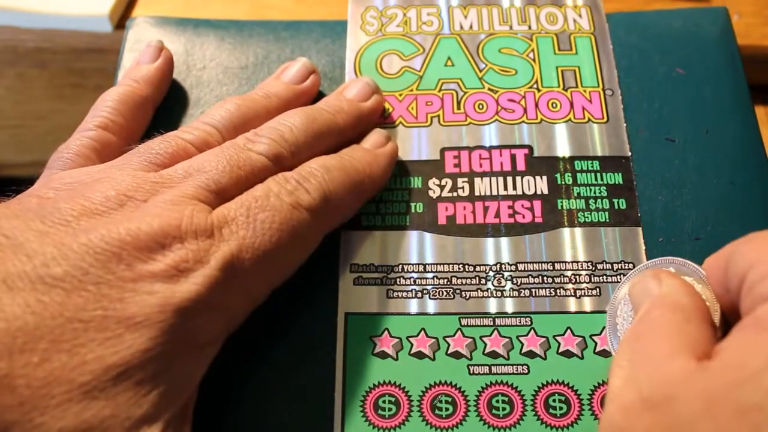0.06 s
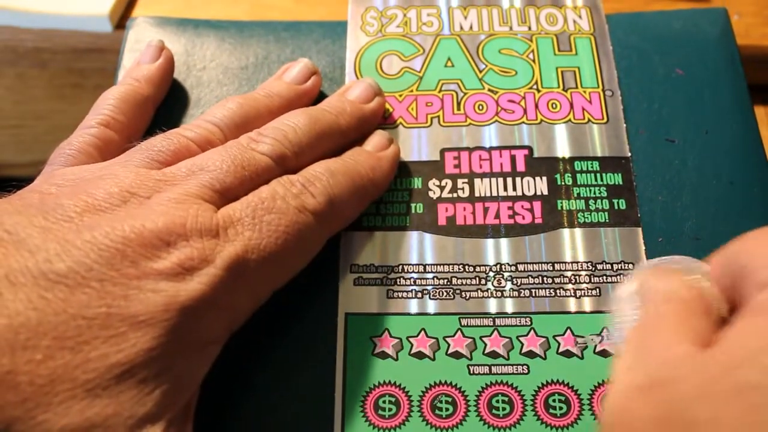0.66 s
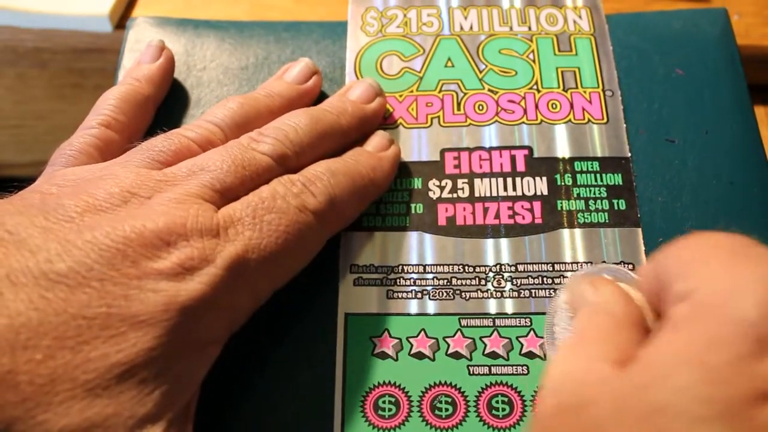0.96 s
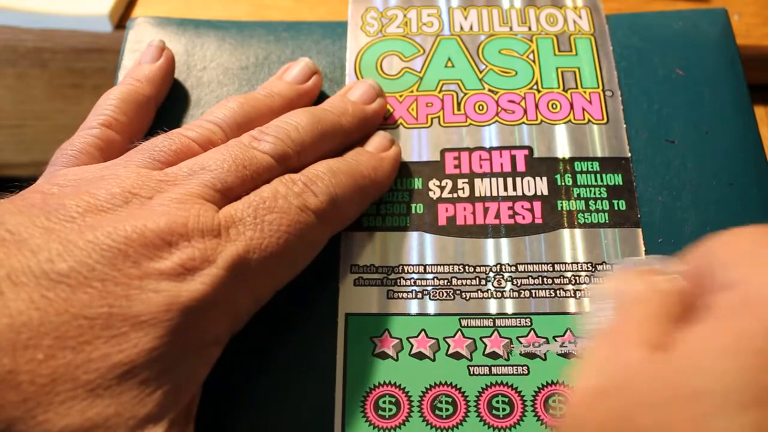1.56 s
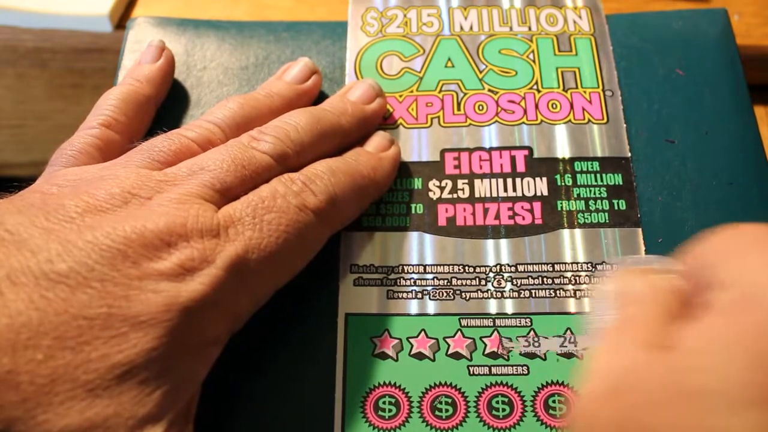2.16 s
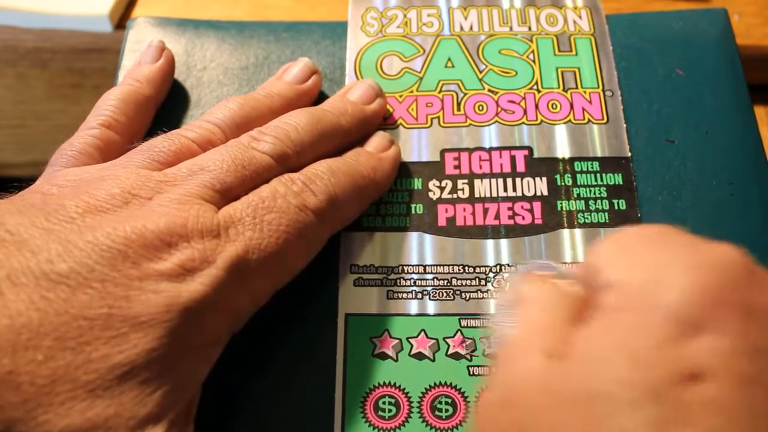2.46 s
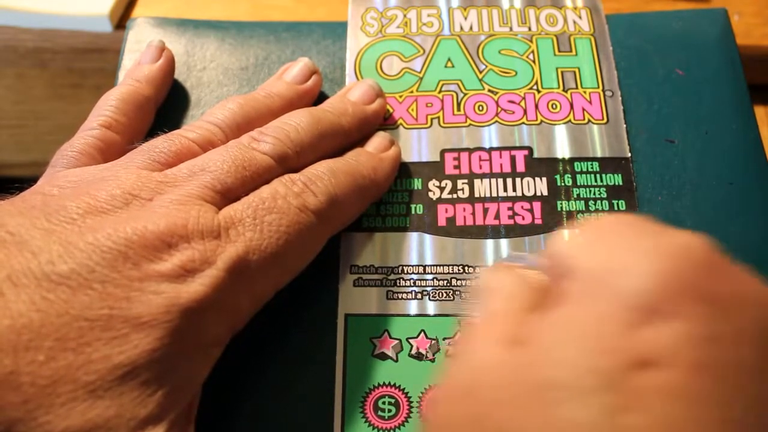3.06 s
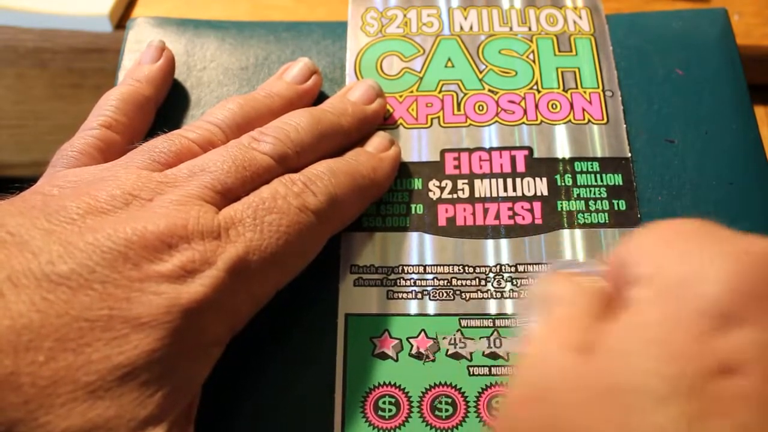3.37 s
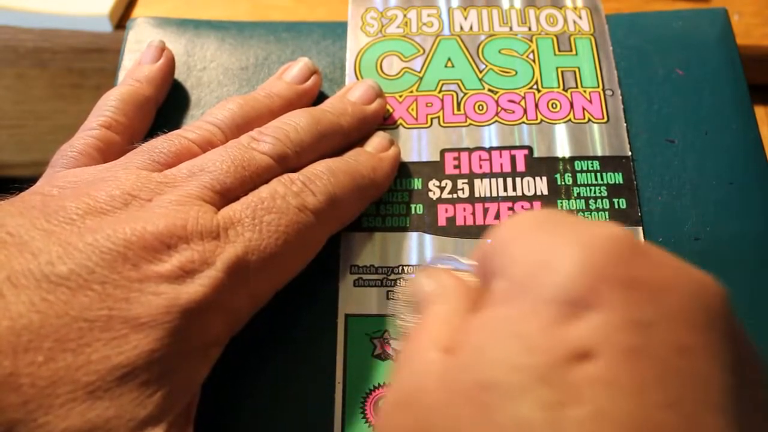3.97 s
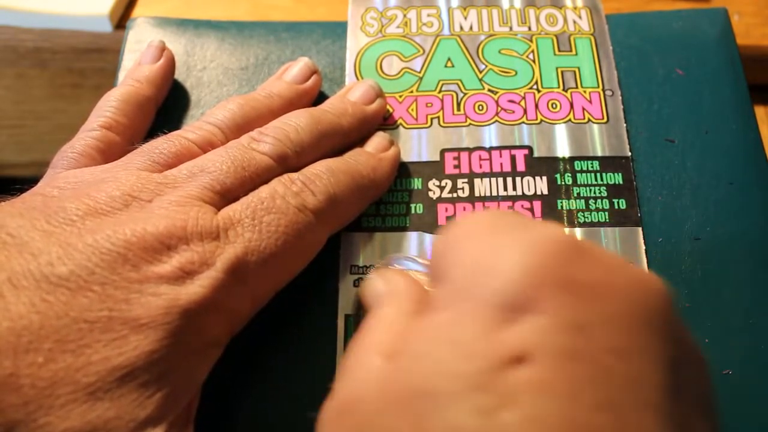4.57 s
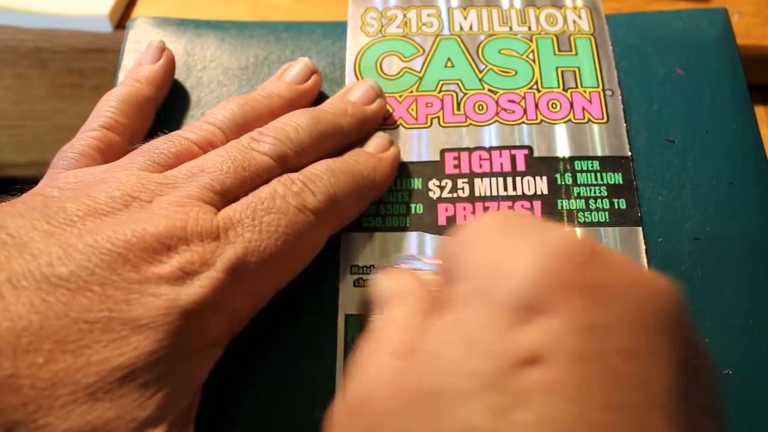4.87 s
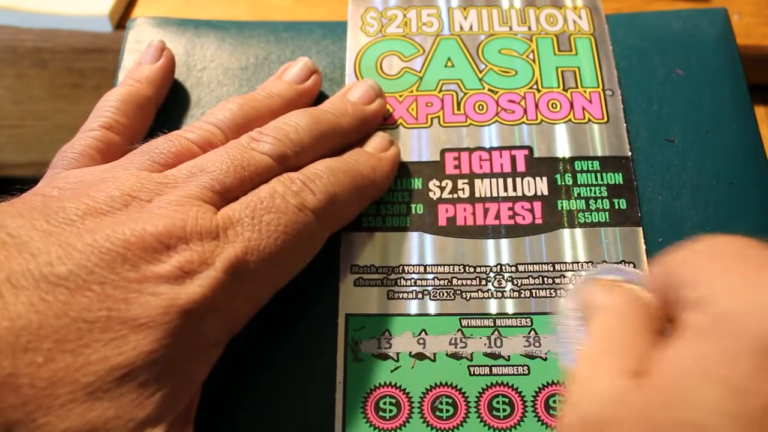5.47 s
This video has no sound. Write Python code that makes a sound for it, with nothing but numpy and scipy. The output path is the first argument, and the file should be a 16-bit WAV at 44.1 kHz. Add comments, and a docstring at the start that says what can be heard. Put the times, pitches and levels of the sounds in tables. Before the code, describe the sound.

A coin scratches a paper ticket in quick, raspy back-and-forth strokes, with soft table thumps, in a quiet room.

```python
"""A small, quiet room, the microphone close to a paper ticket on a padded folder on a wooden table.
A faint clockwork ticks throughout. A coin lands with a few thumps, then scratches at the ticket, hard
forward strokes alternating with lighter returns: the coating crumbles in fine grains, the card rubs,
the table drums. Flakes snap off, the card clacks, the rim ticks; later come brief swishes and thin
whistles. At the end the hand slides away over the glossy card."""
import sys
import numpy as np
from scipy import signal
from scipy.fft import rfft, irfft
from scipy.io import wavfile

SR = 44100
rng = np.random.default_rng(int(sys.argv[2]) if len(sys.argv) > 2 else 0)


def master_out(mix):
    """Clip the mix to full scale and print it as 16-bit PCM to the path in sys.argv[1]."""
    frames = np.transpose(np.atleast_2d(mix))
    ceiling = np.clip(frames, -1, 1)
    pcm = np.round(ceiling * 32767).astype(np.int16)
    wavfile.write(sys.argv[1], SR, pcm)


N = 251590
TIME = np.arange(N) / SR
FFT_SIZE = 8192
FREQS = np.maximum(np.arange(FFT_SIZE // 2 + 1) * SR / FFT_SIZE, 1)

# the quiet room at the microphone: (frequency [Hz], relative level [dB])
ROOM_SPECTRUM = [(15, -28), (25, -3.5), (44, -1), (264, -4), (588, -11), (691, -8), (978, -12), (4380, -17),
                 (5570, -18.5), (6200, -16.5), (15000, -37.5)]
# resonances of the clockwork: (frequency [Hz], width [Hz], height [dB])
CLOCK_MODES = [(5400, 500, 17), (7540, 280, 14), (8250, 1200, 14), (9500, 930, 4)]
# overall slope of coin, card and table together: (frequency [Hz], relative level [dB])
BODY_SLOPE = [(50, -21.5), (130, -24), (230, -10.5), (400, -1), (560, -14), (700, -22.5), (1150, -17.5),
              (1650, -30.5), (3200, -24.5), (4500, -15), (7500, -27), (9300, -34.5), (11500, -48.5),
              (15000, -61)]
# their resonances, table below 600 Hz, card and coin above: (frequency [Hz], width [Hz], height [dB])
BODY_MODES = [(112.3, 8.4, 11.5), (151, 7.3, 12.5), (205, 14.4, 6), (261.7, 19.4, 7.5), (305.2, 25, 5.5),
              (422, 100, 3), (503, 41, 7), (584.7, 39.5, 10), (868, 123, 8), (1077, 19, 3), (1250, 124, 5),
              (2034, 326, 16), (2550, 350, 6), (2948, 63, 6), (4010, 75, 3.5), (4563, 420, -13),
              (5100, 98, 2), (6690, 53, 7), (6920, 43, -16), (7240, 450, 5.5), (9990, 280, 12)]
# the coin lands or catches and thumps the table: (time [s], level [dB])
TABLE_KNOCKS = [(0.375, -35), (0.429, -34), (0.444, -34), (0.461, -31), (0.487, -15.5), (0.497, -11.5),
                (0.645, -27.5), (0.895, -18), (1.252, -14), (1.443, -16.5), (1.464, -13), (2.002, -11.5),
                (2.138, -18.5), (2.319, -14), (2.397, -16.5), (2.515, -22), (2.563, -25), (3.113, -15),
                (3.387, -19), (3.871, -12.5), (4.415, -13.5), (4.857, -15), (5.124, -38), (5.428, -13)]
# strokes, forward and back in turn: (time [s], length [s], coating rasp [dB], card rub [dB],
# table drumming [dB], swell from start to end [dB], upper over lower rasp [dB],
# singing edge over rasp [dB], top treble over rasp [dB], deep boom over drumming [dB])
COIN_STROKES = [(0.494, 0.063, -39, -44.5, -34, -1.5, -5.5, -3, -14, -9.5),
                (0.66, 0.043, -49, -44, -38, 1, -2, -6, -5, -14),
                (0.843, 0.078, -34, -42, -31.5, 2.5, -0.5, -4, -11, -8.5),
                (1.038, 0.073, -38, -45, -36.5, -3, -2.5, -12, -10.5, -17.5),
                (1.193, 0.092, -36.5, -44, -32, 7.0, -0.5, -0.5, -7, -10),
                (1.381, 0.11, -40.5, -43, -37, -4.5, 3, -26, -8, -15),
                (1.553, 0.12, -38, -43, -32.5, 7.5, -1, -2, -10, -12.5),
                (1.752, 0.076, -37, -43.0, -35.0, -2, -0.5, -27, -8, -12.5),
                (1.92, 0.093, -36, -41.5, -32.5, 4, 1.5, -2.5, -7.5, -10.5),
                (2.124, 0.096, -45, -46, -37.5, -10, -1, -20, -9.5, -17),
                (2.282, 0.096, -37, -42.5, -33, 13, 0.5, -2, -7, -11.5),
                (2.499, 0.098, -44.5, -49, -37.5, -4.5, 1, -17.0, -8, -18),
                (2.665, 0.11, -36, -43, -31.5, 2.5, 2.0, -5.5, -8.0, -11.5),
                (2.858, 0.077, -39.5, -48, -34.5, -8, -1.5, -8, -8.5, -15),
                (3.039, 0.104, -38.5, -46.5, -33.0, -7, 0.5, -13.5, -10.5, -12),
                (3.241, 0.084, -46, -51, -35.5, -4.5, 0, -10.5, -8.5, -16.5),
                (3.402, 0.12, -36, -43.0, -30, 7.5, -0.5, -8, -8, -14.5),
                (3.621, 0.082, -40, -46.0, -36, -4.0, 2.5, -14, -8.5, -17.0),
                (3.78, 0.12, -39.0, -46.5, -30.0, 5.5, 1, -8, -7.5, -17.5),
                (3.992, 0.097, -42.5, -50.5, -36.5, -4, 1, -16, -7.5, -19),
                (4.151, 0.11, -39, -46, -30.5, -0.5, 2, -13, -6, -22.5),
                (4.339, 0.11, -40.5, -45, -35.0, -2.5, 1, -10, -6.5, -20),
                (4.503, 0.093, -40.5, -46.5, -31.0, 3.5, 2, -17.0, -6.5, -21),
                (4.661, 0.11, -45.5, -50, -37.5, 6.5, 1, -13, -6, -23),
                (4.831, 0.085, -41.5, -45.5, -31, 1.5, 0, -9, -7, -18),
                (4.989, 0.077, -43.5, -46.5, -36.5, 4.5, 1, -15, -6.5, -20.5),
                (5.149, 0.062, -39.5, -45, -32.5, -5, 1, -14, -8, -12.5),
                (5.324, 0.2, -39.0, -43.5, -34, 1.5, 4.5, -22, -6.5, -20),
                (5.579, 0.11, -39.5, -47, -36, 6, -3.5, -14.5, -10.5, -14.5)]
# the coin digs in for a moment within a stroke: (time [s], lift [dB])
COIN_BITES = [(0.515, 1), (1.25, -0.5), (1.405, 4.5), (2.005, 4), (2.37, 1.5), (2.519, 8.5), (3.04, 2.5),
              (3.132, 9.5), (3.262, 11.5), (3.475, 2), (3.87, 2.5), (4.236, 5.5), (4.59, 4), (4.721, 2.5),
              (5.448, 5)]
# crisp snaps of flaking coating: (time [s], level [dB])
FLAKE_SNAPS = [(0.699, -29.5), (1.49, -25.5), (1.91, -42), (2.004, -20.5), (2.2057, -24), (2.271, -31),
               (2.508, -26), (2.565, -28), (2.6605, -24), (2.7284, -16), (3.027, -42), (3.6188, -26),
               (4.7128, -21.5), (5.146, -26)]
# the card clacks under the coin: (time [s], level [dB])
CARD_CLACKS = [(0.701, -30), (1.441, -43), (1.464, -23.5), (1.501, -23), (1.748, -30), (1.912, -30),
               (2.563, -34.5)]
# the coin's rim touches the card: (time [s], level [dB], pitch [Hz])
COIN_RIM_TICKS = [(1.308, -29, 8300), (1.437, -24, 6000), (2.114, -31, 3900), (2.272, -23, 4200),
                  (2.663, -26, 4600)]
# the side of the hand slides on the card: (time [s], length [s], starting centre [Hz], level [dB])
HAND_SLIDES = [(1.692, 0.035, 1000, -49), (3.551, 0.067, 1070, -50), (5.478, 0.16, 1267, -37.5)]
# thin gliding whistles, one list of points each: (time [s], pitch [Hz], level [dB])
WHISTLE_PATHS = [
    [(3.54, 4150, -64), (3.555, 4250, -44), (3.575, 4330, -51), (3.592, 4170, -50), (3.608, 3900, -66)],
    [(3.70, 3010, -72), (3.765, 3250, -58), (3.78, 3280, -77)],
    [(5.25, 2710, -65), (5.288, 3500, -61), (5.315, 4300, -49), (5.342, 4880, -48), (5.39, 4200, -52),
     (5.43, 4300, -55), (5.465, 4730, -46), (5.50, 4400, -43), (5.55, 3980, -66)],
]
# how each layer follows a stroke: (lead [s], attack [s per 20 dB], release [s per 20 dB],
# arch of the middle over the ends [dB], share of the swell, share of a bite)
RASP_SHAPE = (0.0015, 0.015, 0.038, 2.1, 1.04, 1.14)
SHEEN_SHAPE = (0.0005, 0.017, 0.037, 3, 1.2, 1.15)
RUB_SHAPE = (0.0025, 0.026, 0.055, 2.2, 0.13, 0.17)
DRUM_SHAPE = (0.003, 0.027, 0.048, 1.27, 0.9, 0.52)


def from_db(db):
    """Decibels to gain."""
    return 10 ** (np.asarray(db) / 20)


def rms_one(x):
    """Scale to rms 1."""
    return x / np.sqrt(np.mean(x ** 2) + 1e-20)


def drift(rate):
    """A random wander of rms 1, turning about rate times a second."""
    knots = rng.standard_normal(20000)
    return rms_one(np.interp(TIME * rate, np.arange(len(knots)), knots))


def shape_db(points, modes=()):
    """A spectrum in dB: a slope with resonance humps and dips on it."""
    hz, db = np.transpose(points)
    humps = sum(height / (1 + (2 * (FREQS - centre) / width) ** 2) for centre, width, height in modes)
    return np.interp(np.log(FREQS), np.log(hz), db) + humps


def hump_db(hz, width_hz):
    """The spectrum of one steep-sided resonance."""
    return -20 * np.log10(1 + 2 * ((FREQS - hz) / width_hz) ** 2)


def gate_db(t, length, attack_s, release_s):
    """Rise, hold from t = 0 for the length, and fall; attack and release are times per 20 dB."""
    return -20 * (np.maximum(-t, 0) / attack_s + np.maximum(t - length, 0) / release_s)


def response(db, low_hz=20, high_hz=16000, order=8):
    """Minimum-phase impulse response of unit energy with this spectrum between two edges."""
    band_loss = (1 + (low_hz / FREQS) ** (2 * order)) * (1 + (FREQS / high_hz) ** (2 * order))
    gain = from_db(db) / np.sqrt(band_loss)
    cepstrum = irfft(np.log(gain / gain.max() + 1e-5))
    cepstrum[1:FFT_SIZE // 2] *= 2
    cepstrum[FFT_SIZE // 2 + 1:] = 0
    ring = irfft(np.exp(rfft(cepstrum)))
    return ring / np.linalg.norm(ring)


def through(x, ring):
    """Let x excite an impulse response."""
    return signal.oaconvolve(x.astype(np.float32), ring.astype(np.float32))[:N]


def clicks(times, sizes):
    """Single impulses at the given times."""
    out = np.zeros(N)
    out[np.clip(np.round(np.asarray(times) * SR).astype(int), 0, N - 1)] = sizes
    return out


def bursts(times, levels_db, decay_s):
    """Puffs of noise that start sharply and die away."""
    envelope = through(clicks(times, from_db(levels_db)), np.exp(-TIME[:FFT_SIZE] / decay_s))
    return envelope * rng.standard_normal(N)


def strikes(rows, ring, trim_db=0):
    """Single blows into one response, each peaking at its level plus the trim."""
    times, levels_db = np.transpose(rows)
    return through(clicks(times, from_db(levels_db + trim_db)), ring / abs(ring).max())


def room_tone(level_db):
    """The steady low hush of the room behind everything."""
    return from_db(level_db) * through(rng.standard_normal(N), response(shape_db(ROOM_SPECTRUM)))


def clockwork(level_db, weak_db, decay_s):
    """Ten faint beats a second, weak and strong in turn; after each weak one a spring rings on."""
    first_s, beat_s = 0.088, 0.1002
    beats = np.arange(56)
    beat_db = level_db + weak_db * (beats % 2 == 0) + rng.normal(0, 1, len(beats))
    spectrum_db = shape_db([(3000, 5), (11000, -12), (15000, -13)], CLOCK_MODES)
    ticks = through(bursts(first_s + beat_s * beats, beat_db, decay_s), response(spectrum_db, 2800, 13600))
    swing = np.maximum(np.sin(np.pi * (TIME - first_s) / beat_s), 0)
    spring = from_db(-62) * np.sin(2 * np.pi * 5654 * TIME) * swing
    return ticks + spring


def table_knocks(body_db):
    """The coin lands or catches and thumps the table's low modes."""
    return strikes(TABLE_KNOCKS, response(body_db, 193, 560, order=4), trim_db=-4.5)


def grains(per_s, spread_db):
    """Tiny fractures at random moments, many weak and a few strong; rms 1."""
    sizes = from_db(spread_db * np.minimum(rng.exponential(1, N), 4)) * rng.choice([-1, 1], N)
    return rms_one(sizes * (rng.random(N) < per_s / SR))


def judder(rate, depth_db):
    """The contact grips and slips: a quickly wavering gain of rms 1."""
    return rms_one(from_db(depth_db * np.clip(drift(rate), -2, 2)))


def pressure(levels_db, shape, lag_s=0, bite_s=0.012):
    """Gain of one layer: each stroke sets in, arches, swells or fades, and lets go; bites lift it."""
    lead_s, attack_s, release_s, arch_db, swell_share, bite_share = shape
    power = np.zeros(N)
    for (start, length, _, _, _, swell_db, *_), level_db in zip(COIN_STROKES, levels_db):
        near = slice(*np.searchsorted(TIME, [start - .1, start + length + .2]))
        t = TIME[near] - start + lead_s - lag_s
        from_middle = np.clip(t / length, 0, 1) - .5
        db = level_db + swell_share * swell_db * from_middle - arch_db * (2 * from_middle) ** 2
        power[near] += from_db(db + gate_db(t, length, attack_s, release_s)) ** 2
    for at, lift_db in COIN_BITES:
        near = slice(*np.searchsorted(TIME, [at - .06, at + .06]))
        bite = np.exp(-((TIME[near] - at) / bite_s) ** 2)
        power[near] *= from_db(bite_share * lift_db * bite) ** 2
    return np.sqrt(power)


def roaming(force, body_db, low_hz, high_hz, ripple_hz, ripple_db, spots=4):
    """As the contact moves it meets other nodes: the strengths of the close modes keep changing."""
    weights = np.array([drift(22) for _ in range(spots)])
    weights /= np.linalg.norm(weights, axis=0)
    out = 0
    for weight in weights:
        ripple = np.interp(FREQS / ripple_hz, np.arange(4000), rng.uniform(-1, 1, 4000))
        push = force * weight * rng.choice([-1, 1], N)  # every grain pushes each spot its own way
        out = out + through(push, response(body_db + ripple_db * ripple, low_hz, high_hz))
    return out


def coating_rasp(contact, body_db, rasp_db, bright_db, sheen_db):
    """The coating crumbles under the coin and rings coin and card in three treble bands."""
    crumble = contact * grains(per_s=10000, spread_db=3.5)
    lower_db = rasp_db - 10 * np.log10(1 + from_db(bright_db) ** 2)  # two bands share the rasp's power
    lower = crumble * pressure(lower_db + 0.1, RASP_SHAPE)
    upper = crumble * pressure(lower_db + bright_db - 0.6, RASP_SHAPE)
    sheen = crumble * pressure(rasp_db + sheen_db + 0.53, SHEEN_SHAPE)
    return (roaming(lower, body_db, 1595, 3240, ripple_hz=100.74, ripple_db=11, spots=6)
            + roaming(upper, body_db, 3380, 6670, ripple_hz=128.9, ripple_db=10)
            + roaming(sheen, body_db, 7080, 13300, ripple_hz=140.25, ripple_db=9.5))


def singing_edge(levels_db):
    """Held upright, the coin's edge sings in short spurts, with a weaker mode above."""
    spurts = grains(per_s=6700, spread_db=3) * judder(rate=220, depth_db=4.5)
    modes_db = np.maximum(hump_db(4410, width_hz=560), hump_db(6100, width_hz=1540) - 15.5)
    return through(spurts * pressure(levels_db + 1, RASP_SHAPE), response(modes_db, 1700, 8300))


def card_rub(contact, body_db, rub_db):
    """Friction drives the card's midrange modes."""
    friction = contact * grains(per_s=3500, spread_db=3) * pressure(rub_db + 0.53, RUB_SHAPE)
    return roaming(friction, body_db - 0.93 * np.log2(FREQS), 730, 1630, ripple_hz=54.43, ripple_db=10.5)


def table_drumming(body_db, table_db, boom_db):
    """The pad passes only the slow part of the push to the table, whose deepest modes build up late."""
    push = grains(per_s=1500, spread_db=2) * pressure(table_db - 0.3, DRUM_SHAPE)
    drum = through(push, response(body_db, 205, 727))
    late_pressure = pressure(table_db + boom_db + 3.5, DRUM_SHAPE, lag_s=0.0089)
    late_push = grains(per_s=1500, spread_db=0.4) * late_pressure
    boom = through(late_push, response(body_db, 58, 208.6, order=6))
    return drum + boom


def scratching(body_db):
    """The crumbling coating drives the coin's edge, the card and, through the pad, the table."""
    _, _, rasp_db, rub_db, table_db, _, bright_db, edge_db, sheen_db, boom_db = np.transpose(COIN_STROKES)
    contact = judder(rate=330, depth_db=3.5)
    return (coating_rasp(contact, body_db, rasp_db, bright_db, sheen_db)
            + singing_edge(rasp_db + edge_db)
            + card_rub(contact, body_db, rub_db)
            + table_drumming(body_db, table_db, boom_db))


def flake_snaps(body_db):
    """A flake breaks away in a short cluster of cracks."""
    times, levels_db = np.transpose(FLAKE_SNAPS)
    return through(bursts(times, levels_db - 8.5, decay_s=0.0045), response(body_db, 1940, 12000))


def card_clacks(body_db):
    """A hard catch of the coin makes the card clack."""
    return strikes(CARD_CLACKS, response(body_db, 720, 3000, order=4), trim_db=1.5)


def rim_ticks():
    """The coin's rim gives one bright tick on the card as it lands or lifts."""
    return sum(strikes([(at, db)], response(hump_db(hz, 0.2 * hz), 2000, 11000, order=6))
               for at, db, hz in COIN_RIM_TICKS)


def glide(hz, width_hz):
    """A band of friction noise around a moving centre; rms 1."""
    phase = 2 * np.pi * np.cumsum(hz) / SR
    return rms_one(drift(2 * width_hz) * np.cos(phase) + drift(2 * width_hz) * np.sin(phase))


def hand_slide(rise_octaves_per_s, fade_db_per_s):
    """Ridged skin on the glossy card: a rough swish that rises in pitch and fades."""
    gains = []
    for start, length, _, level_db in HAND_SLIDES:
        t = TIME - start
        gate = np.maximum(gate_db(t, length, attack_s=0.02, release_s=0.07), -100)
        gains.append(from_db(level_db - fade_db_per_s * np.clip(t, 0, length) + gate))
    start, _, start_hz, _ = np.array(HAND_SLIDES)[np.argmax(gains, axis=0)].T  # the loudest sets the pitch
    hz = start_hz * 2 ** (rise_octaves_per_s * np.clip(TIME - start, -.5, .5))
    core = from_db(-1) * glide(hz, width_hz=130)
    skirts = from_db(-3) * glide(hz, width_hz=610)
    octave = from_db(-9.5) * glide(2 * hz, width_hz=480)
    return (core + skirts + octave) * np.max(gains, axis=0) * judder(rate=330, depth_db=1.5)


def whistle(path, waver):
    """A thin, slightly unsteady tone gliding along its path."""
    times, pitches, levels_db = np.transpose(path)
    hz = np.interp(TIME, times, pitches) * (1 + waver * drift(1100))
    gain = from_db(np.interp(TIME, times, levels_db)) * (TIME > times[0]) * (TIME < times[-1])
    return np.sqrt(2) * gain * np.sin(2 * np.pi * np.cumsum(hz) / SR)


def room(direct, t60_s, wet_db):
    """The near walls send a short diffuse tail to the microphone, just behind the direct sound."""
    t = TIME[:SR // 2]
    tail = rng.standard_normal(len(t)) * from_db(-60 * t / t60_s) * (t > .004)
    return direct + from_db(wet_db) * through(direct, tail / np.linalg.norm(tail))


def scene():
    """Coin and hand close to one microphone, with the clockwork and room tone faint behind them."""
    body_db = shape_db(BODY_SLOPE, BODY_MODES)
    coin = table_knocks(body_db) + scratching(body_db)
    coin += flake_snaps(body_db) + card_clacks(body_db) + rim_ticks()
    hand = hand_slide(rise_octaves_per_s=2, fade_db_per_s=25)
    hand += sum(whistle(path, waver=0.0041) for path in WHISTLE_PATHS)
    background = clockwork(level_db=-50, weak_db=-1.5, decay_s=0.0095) + room_tone(level_db=-54)
    return (room(coin + hand, t60_s=0.19, wet_db=-17.5) + background)[None]


def record(dry):
    """The microphone's signal is cut steeply above 15.6 kHz."""
    return signal.sosfilt(signal.ellip(10, .1, 80, 15600, fs=SR, output="sos"), dry)


dry = scene()
out = record(dry)
master_out(out)
```